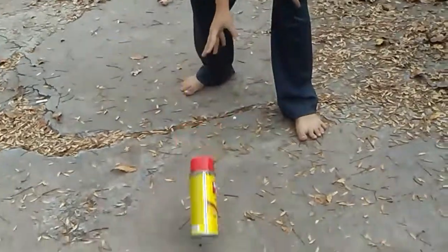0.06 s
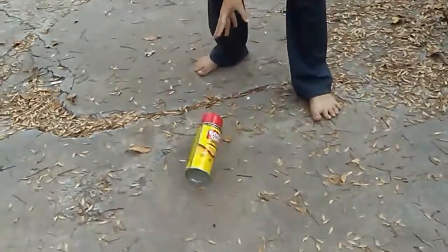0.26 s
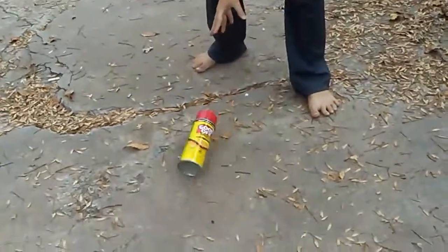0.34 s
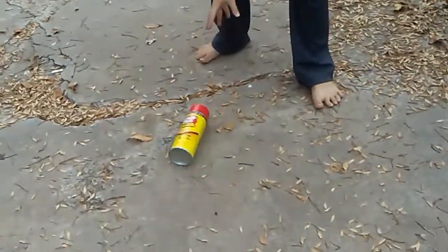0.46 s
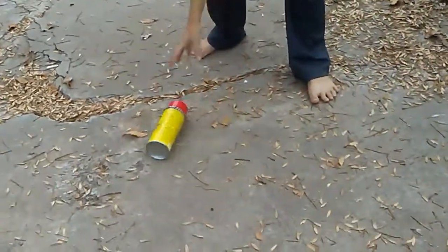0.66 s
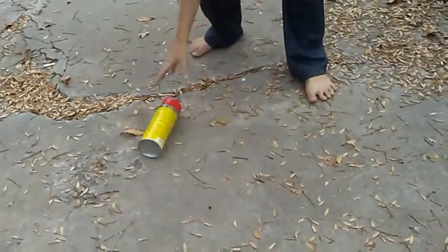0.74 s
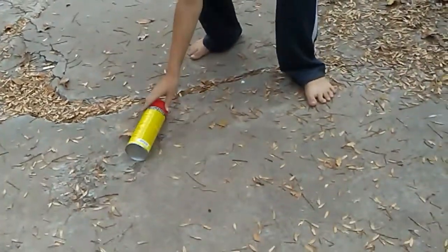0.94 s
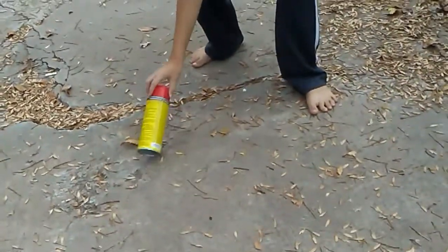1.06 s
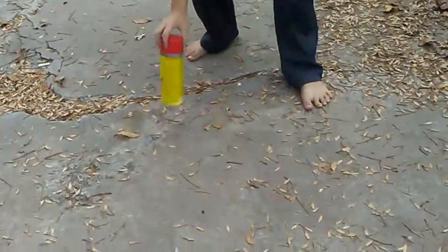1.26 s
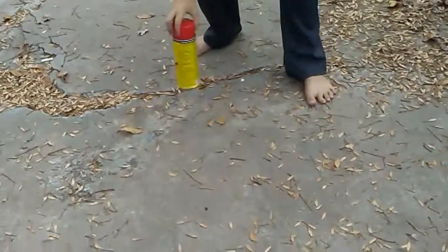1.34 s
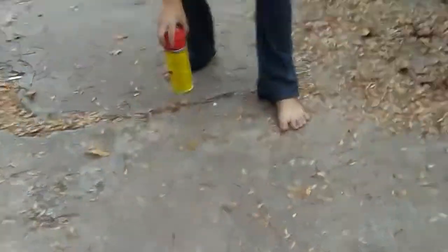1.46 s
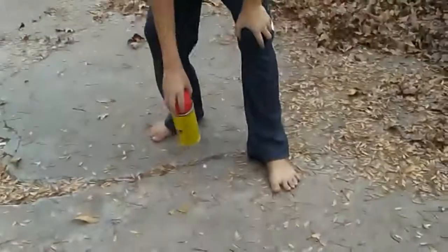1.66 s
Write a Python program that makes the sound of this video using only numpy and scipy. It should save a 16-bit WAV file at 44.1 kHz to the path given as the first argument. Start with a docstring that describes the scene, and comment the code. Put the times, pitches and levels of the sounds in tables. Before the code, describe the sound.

A metal spray can falls on concrete outdoors, heard close with weak yard echo. Quiet low air comes first, then clanging hits at 0.24 and 0.38 seconds, and the loudest around 0.55, with mixing-ball knocks and wavering metallic ringing. Small clatters fade by 0.95. From 1.02 to 1.3 the ball rolls and ticks under a gritty scrape, ending in a knock. One small bright snap comes at 1.45.

```python
"""Quiet outdoor air comes first; then a steel spray can drops on a concrete path with its mixing ball knocking inside.
The can bounces twice, clatters to rest and is picked up with a short scrape, then one small bright snap.
Each contact is a noise crack, a dense clang of the thin shell and ringing sine modes; the ball adds dull noise knocks
and rolls to the bottom as the can is lifted. Scattered grains of noise make the scrape.
A weak yard echo, made of dying noise, follows the can, and a limiter flattens the hardest blows."""
import sys
import numpy as np
from scipy import signal
from scipy.fft import rfft, irfft, next_fast_len
from scipy.io import wavfile
from scipy.ndimage import uniform_filter1d, minimum_filter1d, map_coordinates

SR = 44100
rng = np.random.default_rng(int(sys.argv[2]) if len(sys.argv) > 2 else 0)


def generate_wav(signal):
    """Clip the signal to [-1, 1] and save it as 16-bit WAV at the path in sys.argv[1]."""
    frames = np.transpose(np.atleast_2d(signal))
    scaled = np.clip(frames, -1, 1) * 32767
    pcm = np.round(scaled).astype(np.int16)
    wavfile.write(sys.argv[1], SR, pcm)


N = 74970  # length in samples
T = np.arange(N) / SR  # time in seconds
T_SECOND = T[:SR]  # the first second, for single blows


def amp(db):
    """Turn decibels into a gain."""
    return 10 ** (np.asarray(db) / 20)


def unit(x):
    """Scale to an average (rms) level of 1."""
    return x / np.sqrt(np.mean(x ** 2) + 1e-20)


def along(points, hz):
    """Read a curve of (Hz, value) points on a logarithmic pitch axis."""
    point_hz, values = np.transpose(points)
    return np.interp(np.log(hz + 1), np.log(point_hz + 1), values)


def curves(rows):
    """Draw straight lines between table rows: one value per sample for each column after the time."""
    seconds, *columns = np.transpose(rows)
    return [np.interp(T, seconds, column) for column in columns]


def wobble(rate):
    """A smooth random curve with rate random points a second."""
    return map_coordinates(rng.standard_normal(4096), [T * rate], mode="wrap")


def colour(x, points):
    """Filter with unit power gain through (Hz, dB) points, with no sound before its cause."""
    size = 2 * next_fast_len(N)
    gain = unit(amp(along(points, np.fft.rfftfreq(size, 1 / SR))))
    # folding the cepstrum gives the phase that makes the filter react at once
    cepstrum = irfft(np.log(gain))
    cepstrum[1:size // 2] *= 2
    cepstrum[size // 2 + 1:] = 0
    return irfft(rfft(x, size) * np.exp(rfft(cepstrum)))[:N]


def fade(t, t60):
    """Exponential decay that falls 60 dB in t60 seconds."""
    return np.exp(-np.log(1000) * t / t60)


def swell(t, rise_s):
    """A rise from 0 towards 1 with time constant rise_s."""
    return 1 - np.exp(-t / rise_s)


def dying_noise(noise, t60s, size=256):
    """A dense ring in which each frequency dies at its own speed."""
    hz, t, spectrum = signal.stft(noise, SR, nperseg=size)
    decay = fade(t, along(t60s, hz)[:, None])
    return signal.istft(spectrum * decay, SR, nperseg=size)[1][:SR]


def add(track, start_s, sound):
    """Mix a sound into the track at its start time."""
    part = track[round(start_s * SR):][:len(sound)]
    part += sound[:len(part)]


# Tone of the outdoor air. Columns: pitch_hz [Hz], level_db [dB, relative]
AIR_COLOUR = [(20, -20.5), (55, 3), (100, -1), (200, -16.5), (450, -18), (1000, -27.5), (4500, -32.5),
              (16000, -45.5)]
AIR_DB, AIR_SWAY_DB = -51, 0.8


def air():
    """Outdoor air is steady noise, mostly low rumble with faint hiss, whose level sways a little."""
    level = amp(AIR_DB + AIR_SWAY_DB * wobble(5.3))
    return level * unit(colour(rng.standard_normal(N), AIR_COLOUR))


MODE_ATTACK_S = 0.0027  # time constant of each mode's rise
MODE_SCATTER_DB, DETUNE = 3, 0.003  # typical random spread per strike: level, and share of the pitch


def ring(modes, hold):
    """Struck metal rings in several fading tones, a little different each time; hold scales their ringing time."""
    t = T[:SR // 2]
    hz, db, t60 = np.transpose(modes)[:, :, None]
    level, tune, phase = rng.standard_normal((3, len(modes), 1))
    waves = np.sin(2 * np.pi * (hz * (1 + DETUNE * tune) * t + phase))
    tones = amp(db + MODE_SCATTER_DB * level) * waves * fade(t, t60 * hold)
    return np.sum(tones, axis=0) * swell(t, MODE_ATTACK_S)


# Mixing ball striking the can. Columns: start_s [s], knock_db [dB], main ring and base modes: ring_db [dB]
BALL_KNOCKS = [(.2385, -11.5, -41.5), (.266, -5, -42), (0.3841, -11, -48), (.417, -12, -24),
               (0.5261, -1.5, -39), (0.5716, -15, -42), (0.6146, -12, -17.5), (.652, -13, -44),
               (1.159, -35, -45), (1.222, -28, -46), (1.2794, -13, -27.5)]
# Tone of a knock. Columns: pitch_hz [Hz], level_db [dB, relative]
KNOCK_COLOUR = [(120, -25), (300, -6.5), (520, -12.5), (800, -2), (1500, 1), (2600, -2.5), (3800, -12),
                (7000, -15.5), (15000, -28.5)]
# Ringing tones of the base. Columns: pitch_hz [Hz], level_db [dB, relative], t60_s [s]
BASE_TONES = [(1246, -14, 0.28), (2024, -11.5, .2), (2112, -10.5, 0.37), (4150, -25, .6)]
KNOCK_RATTLE_DB, KNOCK_T60 = -8, 0.019  # short noise after the click: level, t60 in s
KNOCK_TAIL_DB, KNOCK_TAIL_T60 = -28, 0.2  # longer, weaker noise: level, t60 in s


def ball():
    """The mixing ball knocks inside the can: a click with short dull noise, and a ring of the base."""
    blows, modes = np.zeros((2, N))
    for start_s, knock_db, ring_db in BALL_KNOCKS:
        rattle = amp(KNOCK_RATTLE_DB) * fade(T_SECOND, KNOCK_T60)
        tail = amp(KNOCK_TAIL_DB) * fade(T_SECOND, KNOCK_TAIL_T60)
        blow = (rattle + tail) * rng.standard_normal(SR)
        blow[0] += 5  # the click of first touch
        add(blows, start_s, amp(knock_db) * blow)
        add(modes, start_s, amp(ring_db) * ring(BASE_TONES, 1))
    return colour(blows, KNOCK_COLOUR) + modes


# How long the free shell rings. Columns: pitch_hz [Hz], t60_s [s]
SHELL_RINGING = [(300, 0.23), (1500, 0.22), (4000, 0.17), (8000, 0.18), (15000, 0.66)]
SHELL_ATTACK_S = 0.001  # rise time constant
CLUMP_DEPTH_DB, CLUMP_WIDTH_HZ = 3.6, 110  # depth fades out below 1000 Hz


def clang(hold):
    """A thin shell has crowded bending modes; each contact favours its own random clumps of them."""
    hz = np.fft.rfftfreq(SR, 1 / SR)
    depth_db = CLUMP_DEPTH_DB * np.minimum(1, hz / 1000)
    uneven = map_coordinates(rng.standard_normal(1024), [hz / CLUMP_WIDTH_HZ], mode="wrap")
    clumps = unit(amp(depth_db * uneven))
    noise = irfft(rfft(rng.standard_normal(SR)) * clumps)
    t60s = [(f, t60 * hold) for f, t60 in SHELL_RINGING]
    return dying_noise(noise, t60s) * swell(T_SECOND, SHELL_ATTACK_S)


# Can on concrete. Columns: start_s [s], crack_db [dB], shell_db [dB], main ring and low modes: low_db [dB],
# high modes: high_db [dB], hold [share of the free ringing time]
GROUND_CONTACTS = [(0.2386, -14.5, -15.5, -11.5, -29, 0.49), (0.2459, -40, -14, -30, -32, 0.94),
                   (0.2581, -14, -10.5, -8.5, -35, 0.76), (.282, -14.5, -15.5, -31, -41.5, 0.8),
                   (0.301, -23, -18, -17, -44.5, 0.49), (0.3831, -12, -11, -13, -36, 1.0),
                   (.401, -17, -15.5, -10, -34, 0.76), (.417, -25, -20, -15, -30.5, 0.86),
                   (.447, -35, -22, -13, -47, 0.74), (.572, -3.5, -8, -23, -24.5, 0.55),
                   (.583, -16, -25, -10.5, -28.5, 1), (.6148, -17.5, -17, -40, -25, 0.75),
                   (.652, -18, -16.5, -47, -38.5, 0.48), (0.658, -18.5, -35, -19, -35.5, 1.0),
                   (0.7141, -27.5, -25.5, -25, -30.5, 0.31), (0.7571, -31, -41, -29, -36.5, 0.67),
                   (.769, -33, -39, -31, -32.5, 0.55), (0.834, -32, -39.5, -54, -52.5, 0.53),
                   (0.857, -22.5, -41.5, -46, -46.5, 1), (.873, -44, -40.5, -39, -57, 0.75),
                   (.951, -32, -37, -57, -37.5, 0.3)]
# Tone of the crack. Columns: pitch_hz [Hz], level_db [dB, relative]
CRACK_COLOUR = [(150, -3), (2000, 0), (5000, 0.5), (8500, 3.5), (12000, -5), (16000, -20)]
# Tone of the shell's dense bending modes. Columns: pitch_hz [Hz], level_db [dB, relative]
SHELL_COLOUR = [(130, -20), (350, -12.5), (800, -7), (1500, -7), (2300, -2), (3700, 2.5), (4700, 3.5),
                (5400, -5), (7700, -8), (10000, -22.5), (13000, -31), (16000, -34)]
# Low modes of the can. Columns: pitch_hz [Hz], level_db [dB, relative], free ringing time: t60_s [s]
LOW_TONES = [(1297.3, -24, 0.61), (1836.4, -7, 0.13), (2493, -15.5, 0.1)]
# High modes of the can. Columns: pitch_hz [Hz], level_db [dB, relative], free ringing time: t60_s [s]
HIGH_TONES = [(2987, -15.5, 0.24), (3155, -4, 0.13), (3310, 1.5, 0.29), (3415, -2, 0.2), (3615, -2.5, .3),
              (4020, -6, 0.51), (4560, -3.5, 0.18)]
CRACK_T60 = 0.02  # seconds
CRACK_RISE_S, GRAZE_RISE_S = 0.00008, 0.002  # rise time constant of a 0 dB blow, and the slowest allowed


def bounces():
    """Each contact cracks on the concrete and rings the shell and modes, damped by the ground."""
    cracks, shell, modes = np.zeros((3, N))
    for start_s, crack_db, shell_db, low_db, high_db, hold in GROUND_CONTACTS:
        # a light graze rises more slowly than a full blow
        rise = swell(T_SECOND, min(GRAZE_RISE_S, CRACK_RISE_S / amp(crack_db)))
        crack = rng.standard_normal(SR) * rise * fade(T_SECOND, CRACK_T60)
        add(cracks, start_s, amp(crack_db) * crack)
        add(shell, start_s, amp(shell_db) * clang(hold))
        add(modes, start_s, amp(low_db) * ring(LOW_TONES, hold))
        add(modes, start_s, amp(high_db) * ring(HIGH_TONES, hold))
    return colour(cracks, CRACK_COLOUR) + colour(shell, SHELL_COLOUR) + modes


# Wavering pitch of the can's strongest mode. Columns: time_s [s], pitch_hz [Hz]
MAIN_PITCH = [(.24, 1800), (.27, 1840), (.30, 1812), (.37, 1845), (.425, 1795), (.47, 1838), (.59, 1772),
              (.64, 1775), (.675, 1810), (.73, 1780), (1.28, 1800)]
MAIN_DB, MAIN_T60 = -0.5, 0.19  # level, free ringing time in s
MAIN_ROUGH_DB, MAIN_ROUGH_PER_S = 2.5, 110  # random level flutter: depth, points a second


def main_ring():
    """The can's strongest mode is one thin, wavering tone that every blow feeds with energy."""
    blows = [(start_s, low_db, hold) for start_s, _, _, low_db, _, hold in GROUND_CONTACTS]
    blows += [(start_s, ring_db, 1) for start_s, _, ring_db in BALL_KNOCKS]
    energy = np.zeros(N)
    for start_s, db, hold in blows:
        swing = amp(db) * fade(T, MAIN_T60 * hold) * swell(T, MODE_ATTACK_S)
        add(energy, start_s, swing ** 2)
    hz, = curves(MAIN_PITCH)
    tone = np.sin(2 * np.pi * np.cumsum(hz) / SR)
    level = amp(MAIN_DB + MAIN_ROUGH_DB * wobble(MAIN_ROUGH_PER_S))
    return level * np.sqrt(energy) * tone


# Swells of the can's lowest ringing tone. Columns: start_s [s], level_db [dB], pitch_hz [Hz]
LOW_SWELLS = [(0.245, -23.5, 830), (0.33, -19, 770.6), (.417, -30.5, 788), (.58, -32, 778)]
LOW_RISE_S, LOW_T60 = 0.02, 0.41  # rise time constant, t60 in s


def low_ring():
    """The lowest tone of the can swells slowly and sings between the bounces."""
    out = np.zeros(N)
    for start_s, db, hz in LOW_SWELLS:
        tone = np.sin(2 * np.pi * hz * (T + start_s))
        add(out, start_s, amp(db) * tone * swell(T, LOW_RISE_S) * fade(T, LOW_T60))
    return out


# How long the yard echo lasts. Columns: pitch_hz [Hz], t60_s [s]
YARD_RINGING = [(200, 0.96), (1500, 0.53), (5000, 0.51), (14000, .5)]
YARD_DB = -13.5


def yard_echo(can):
    """Many weak reflections blur each sound into a fading tail of noise."""
    tail = dying_noise(rng.standard_normal(SR), YARD_RINGING) * swell(T_SECOND, 0.015)
    return amp(YARD_DB) * signal.fftconvolve(can, tail / np.linalg.norm(tail))[:N]


# Ball bumping down the wall. Columns: start_s [s], level_db [dB]
ROLL_BUMPS = [(1.018, -42.5), (1.033, -40), (1.055, -44), (1.079, -41), (1.1, -41.5)]
# Level of the ball's small ticks before filtering. Columns: time_s [s], level_db [dB]
RATTLE_LEVEL = [(1.1, -57), (1.15, -43.5), (1.23, -45.5), (1.28, -48)]
# Tone of the ticks. Columns: pitch_hz [Hz], level_db [dB, relative]
TICK_COLOUR = [(600, -12.5), (1050, 6.5), (1400, -6.5), (2200, -2.5), (3000, -27)]
ROLL_HZ, ROLL_FLUTTER_PER_S = 940, 300  # centre pitch, random points a second
ROLL_T60, ROLL_RISE_S = 0.072, 0.0015  # t60 in s, rise time constant
TICKS_PER_S = 1200  # average


def roll():
    """As the can tilts, the ball bumps softly along the wall, then breaks into a dense ticking."""
    bumps = np.zeros(N)
    for start_s, db in ROLL_BUMPS:
        add(bumps, start_s, amp(db) * fade(T, ROLL_T60) * swell(T, ROLL_RISE_S))
    # a randomly fluttering tone makes a narrow, hollow noise
    flutter = wobble(ROLL_FLUTTER_PER_S) + 1j * wobble(ROLL_FLUTTER_PER_S)
    hollow = unit(np.real(flutter * np.exp(2j * np.pi * ROLL_HZ * T)))
    db, = curves(RATTLE_LEVEL)
    ticks = unit((rng.random(N) < TICKS_PER_S / SR) * rng.standard_normal(N))
    ticking = (T > RATTLE_LEVEL[0][0]) * (T < RATTLE_LEVEL[-1][0])
    return bumps * hollow + colour(amp(db) * ticks * ticking, TICK_COLOUR)


# Level of the scrape. Columns: time_s [s], level_db [dB]
SCRAPE_LEVEL = [(1.054, -56), (1.066, -46), (1.11, -38), (1.17, -42.5), (1.3, -55), (1.42, -66)]
# Tone of the scrape. Columns: pitch_hz [Hz], level_db [dB, relative]
GRIT_COLOUR = [(2800, -20.5), (3500, 1), (4550, 1), (5100, -9), (5650, -6.5), (6200, -12), (10000, -21.5),
               (16000, -38)]
GRITS_PER_S = 4300  # average
SCRAPE_RELEASE_T60 = 0.2  # seconds, after the last table row


def scrape():
    """The rim drags over grit as the can is lifted: many tiny random clicks, filtered."""
    db, = curves(SCRAPE_LEVEL)
    clicks = (rng.random(N) < GRITS_PER_S / SR) * rng.standard_normal(N)
    grit = unit(colour(clicks, GRIT_COLOUR))
    started = T > SCRAPE_LEVEL[0][0]
    release = fade(np.maximum(0, T - SCRAPE_LEVEL[-1][0]), SCRAPE_RELEASE_T60)
    return amp(db) * grit * started * release


# Tone of the snap's noise. Columns: pitch_hz [Hz], level_db [dB, relative]
SNAP_TONE = [(800, -23), (2800, -2), (5300, -4), (15000, -16)]
CHIP_S, CHIP_DB, CHIP_PEAK_S = 1.4482, -22, 0.00087  # start; ping level, and time to its peak
CHIP_TOP_HZ, CHIP_END_HZ, CHIP_FALL_S = 6320, 3800, 0.0016  # ping pitch, and time constant of its fall
SNAP_DB, SNAP_T60 = -28, 0.011  # noise gain, t60 in s


def chip():
    """One small bright snap: a burst of noise and a ping that falls fast in pitch."""
    hz = CHIP_END_HZ + (CHIP_TOP_HZ - CHIP_END_HZ) * np.exp(-T / CHIP_FALL_S)
    rise = T / CHIP_PEAK_S
    pulse = rise * np.exp(1 - rise)  # rises to 1, then dies away
    ping = amp(CHIP_DB) * pulse * np.sin(2 * np.pi * np.cumsum(hz) / SR)
    burst = rng.standard_normal(N) * fade(T, SNAP_T60)
    snap = amp(SNAP_DB) * colour(burst, SNAP_TONE)
    out = np.zeros(N)
    add(out, CHIP_S, ping + snap)
    return out


def scene():
    """Mix the can with its yard echo, the snap without echo, and the outdoor air."""
    can = bounces() + main_ring() + low_ring() + ball() + roll() + scrape()
    return (can + yard_echo(can) + chip() + air())[None]


CEILING, LIMIT_HOLD_S = 0.79, 0.0065  # limiter threshold (full scale is 1), smoothing window
TOP_HZ = 16100  # steep treble cutoff


def record(dry):
    """A fast limiter turns down the peaks, then a steep filter removes the highest treble."""
    window = max(2, int(LIMIT_HOLD_S * SR))
    needed_gain = np.minimum(1, CEILING / (np.abs(dry) + 1e-9))
    gain = uniform_filter1d(minimum_filter1d(needed_gain, window), window)
    hz = np.fft.rfftfreq(2 * N, 1 / SR)
    return irfft(rfft(dry * gain, 2 * N) / (1 + (hz / TOP_HZ) ** 120))[:, :N]


dry = scene()
out = record(dry)
generate_wav(out)
```